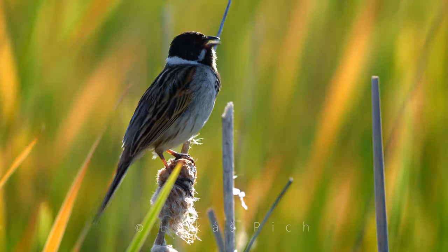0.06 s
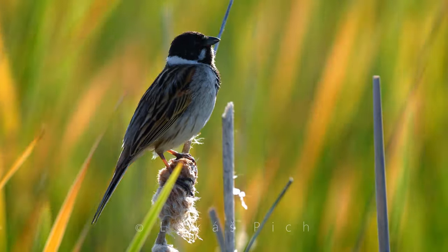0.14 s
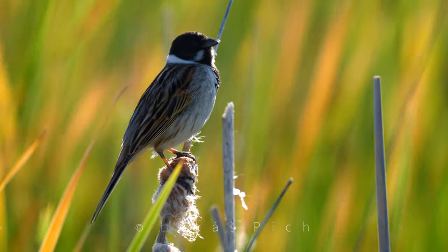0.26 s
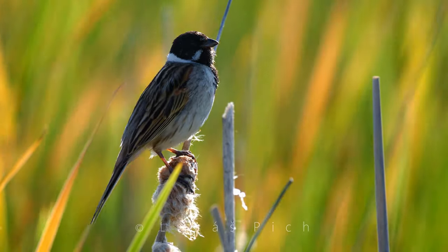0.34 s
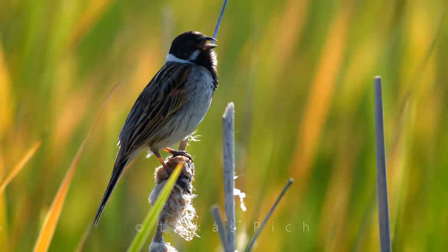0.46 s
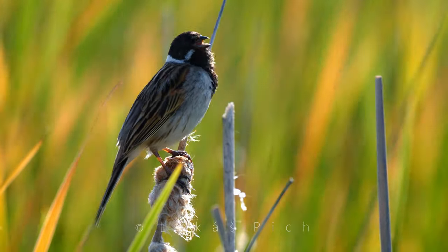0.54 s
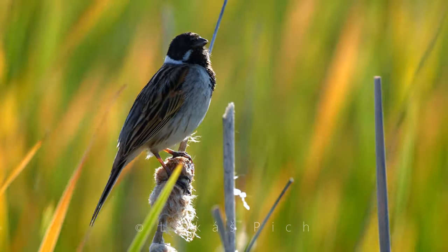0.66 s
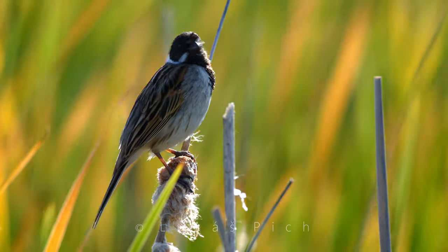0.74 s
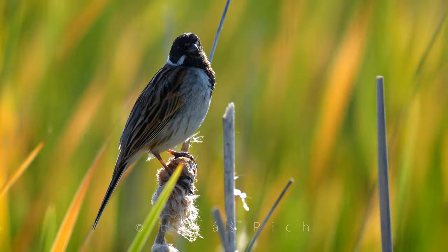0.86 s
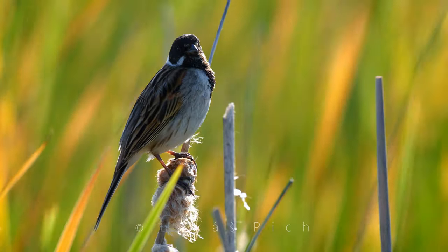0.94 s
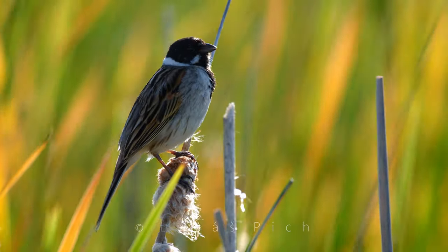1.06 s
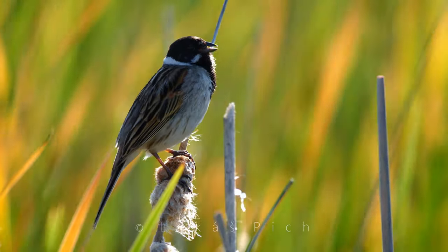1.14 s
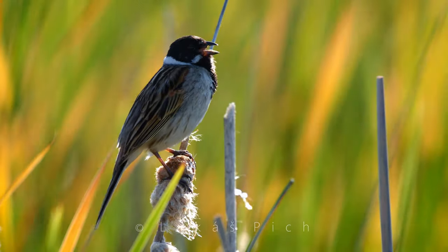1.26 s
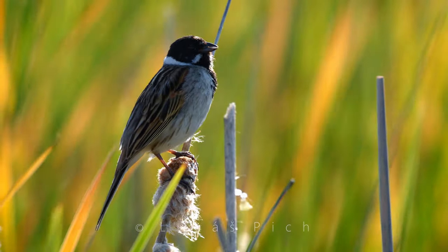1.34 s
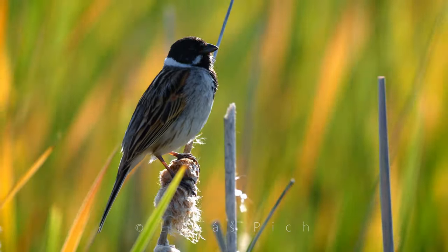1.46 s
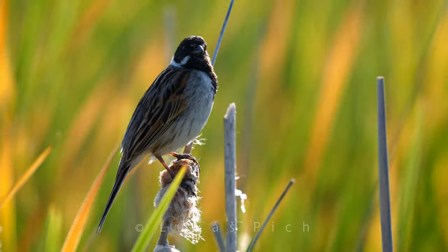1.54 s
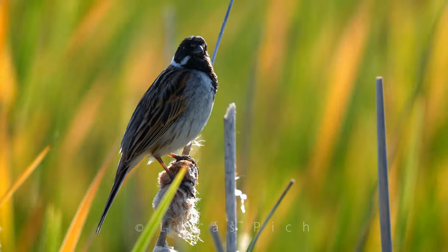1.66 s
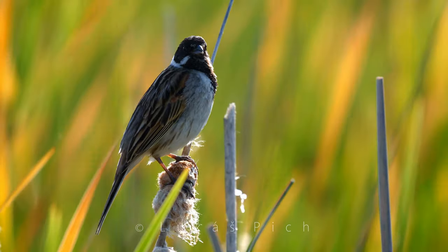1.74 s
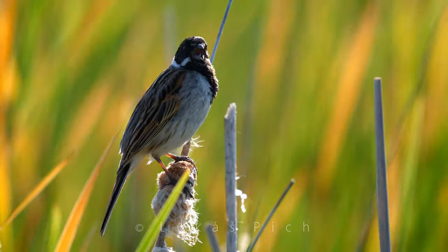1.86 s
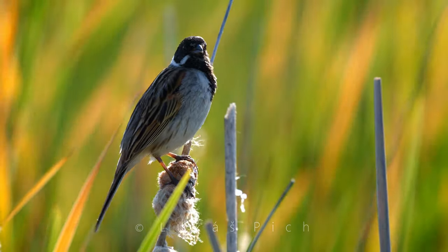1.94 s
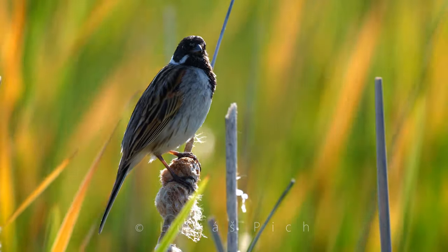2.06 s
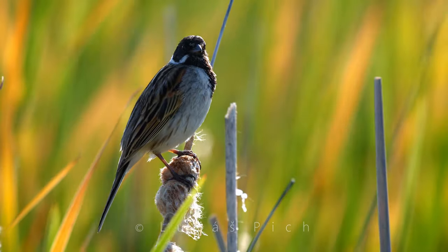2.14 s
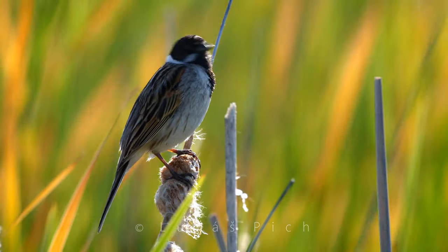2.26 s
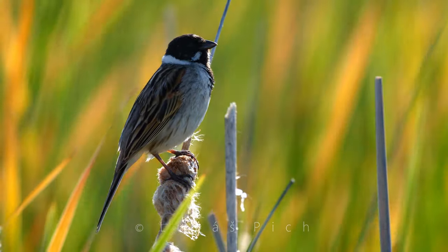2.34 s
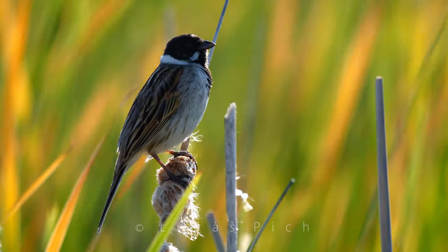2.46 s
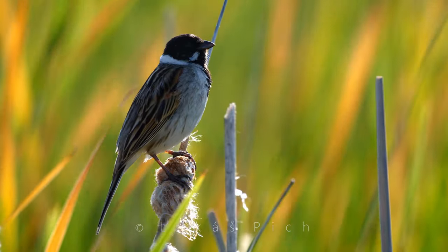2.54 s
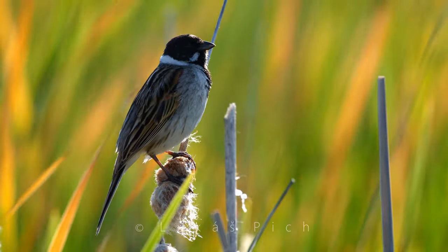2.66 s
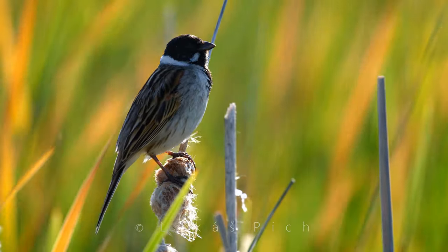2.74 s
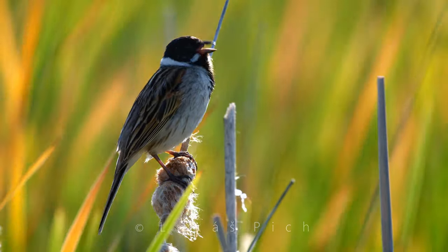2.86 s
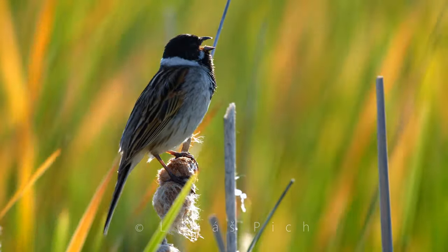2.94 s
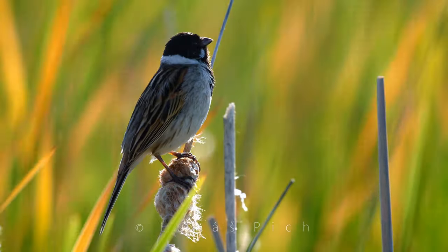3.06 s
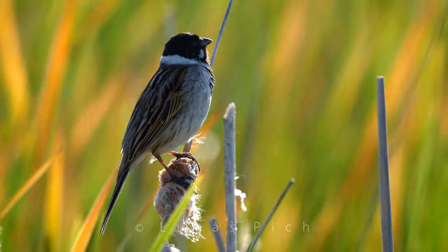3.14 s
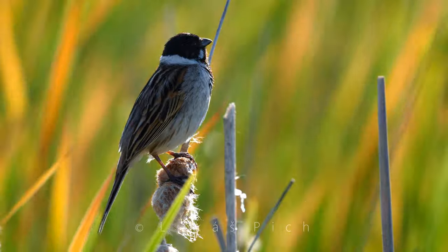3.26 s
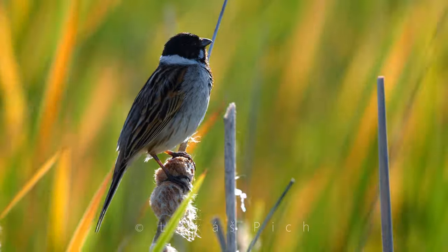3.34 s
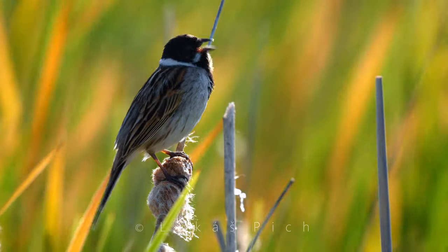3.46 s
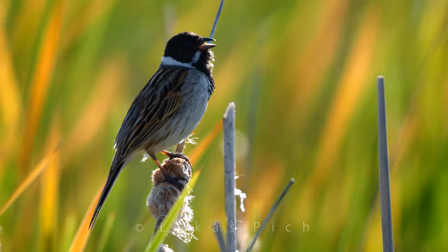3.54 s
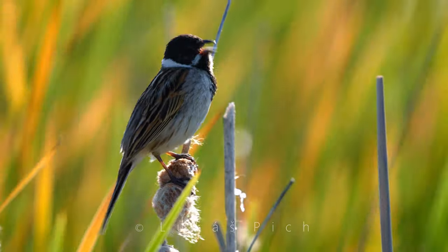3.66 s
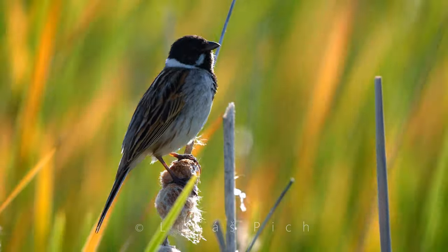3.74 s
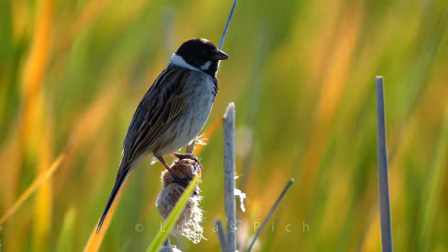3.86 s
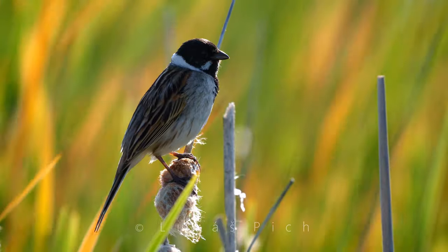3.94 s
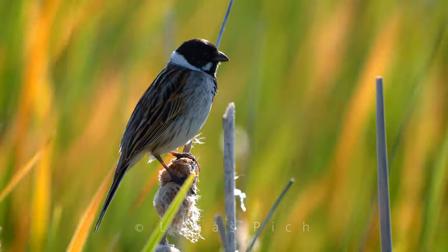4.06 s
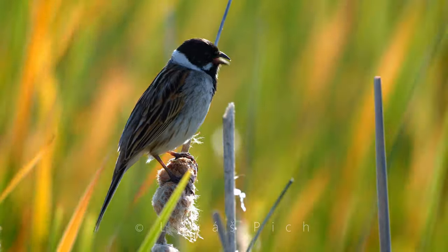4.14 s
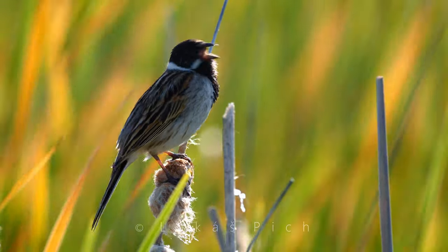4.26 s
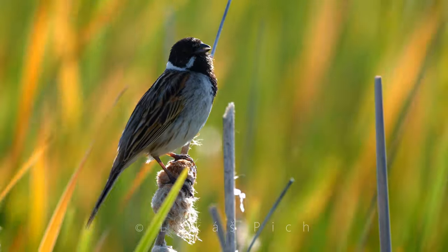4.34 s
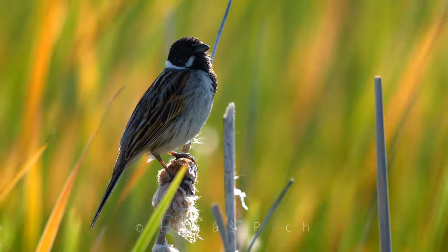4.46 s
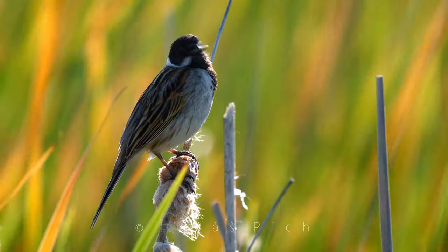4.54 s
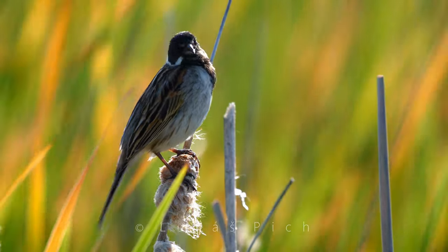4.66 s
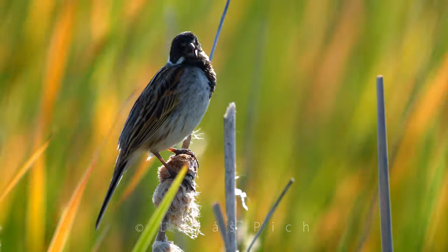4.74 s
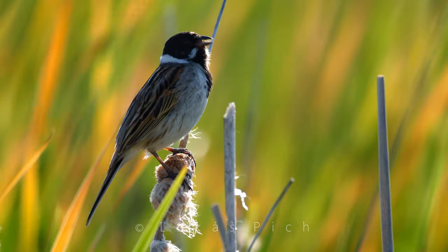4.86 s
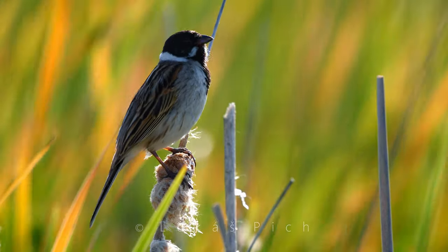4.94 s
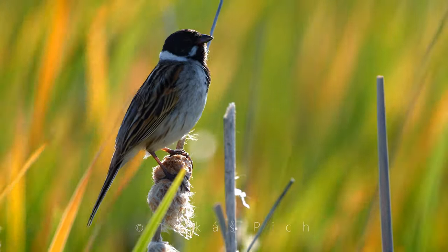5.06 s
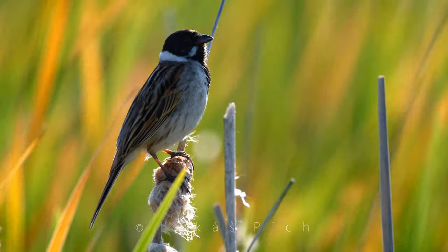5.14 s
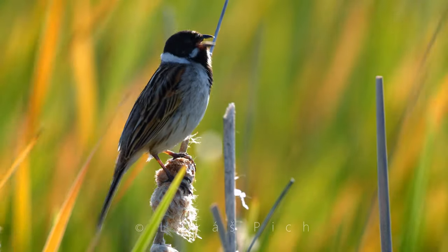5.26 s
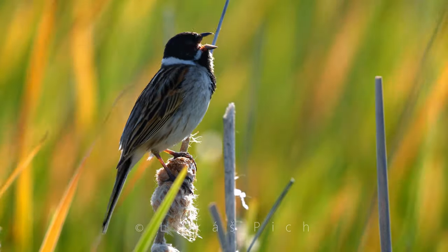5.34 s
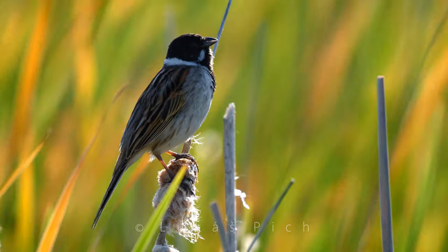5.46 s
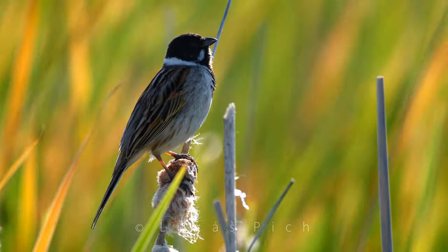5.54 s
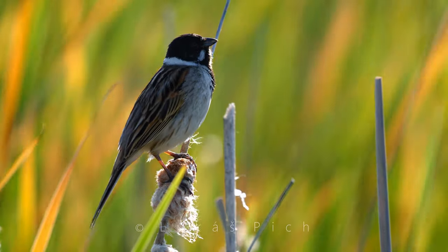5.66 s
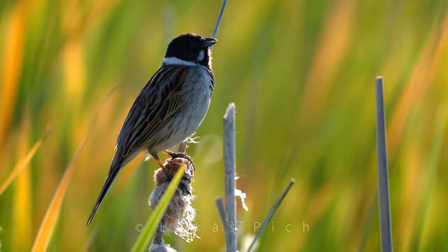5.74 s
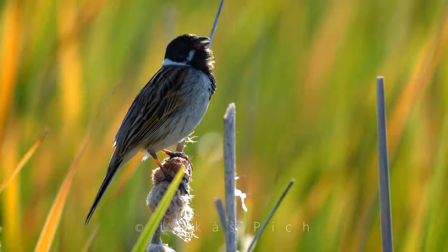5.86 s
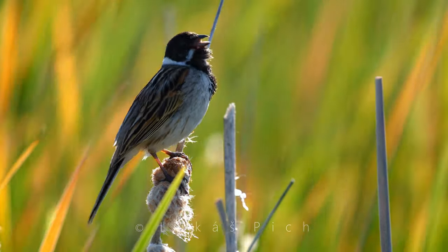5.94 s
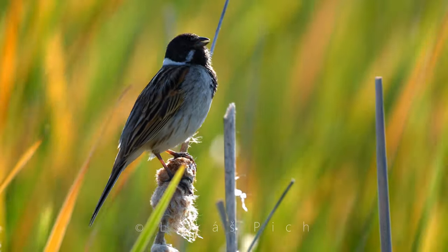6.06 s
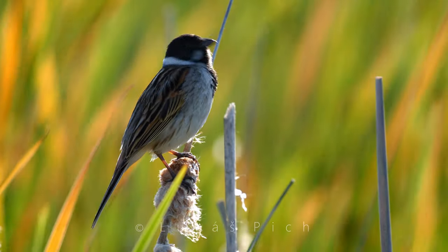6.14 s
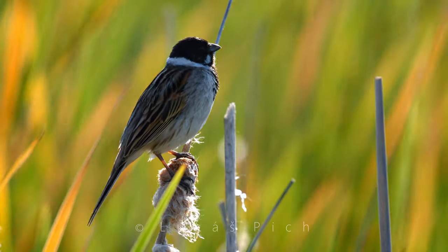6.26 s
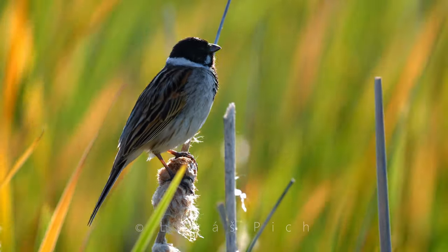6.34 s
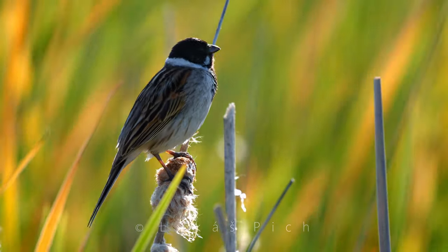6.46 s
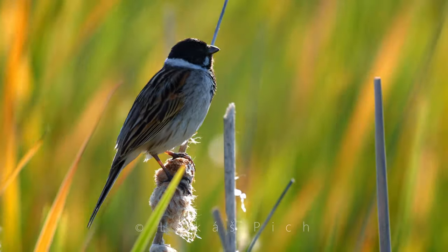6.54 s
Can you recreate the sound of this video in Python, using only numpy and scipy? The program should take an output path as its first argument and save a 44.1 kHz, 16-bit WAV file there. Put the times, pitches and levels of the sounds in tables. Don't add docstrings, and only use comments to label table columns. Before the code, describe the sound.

A small songbird close by sings short whistled and buzzing syllables with pauses between, over faint distant birds, frog ticks and soft marsh hush.

```python
import sys
import numpy as np
from scipy import signal
from scipy.fft import rfft, irfft
from scipy.io import wavfile
from scipy.ndimage import uniform_filter1d

SR = 44100
rng = np.random.default_rng(int(sys.argv[2]) if len(sys.argv) > 2 else 0)


def pcm_store(signal):
    levels = np.round(np.clip(np.atleast_2d(signal), -1, 1) * 32767)
    wavfile.write(sys.argv[1], SR, levels.astype(np.int16).T)


def how_loud(loudness_db):
    steps = np.asarray(loudness_db, float) / 20
    return 10 ** steps


N = 291060
LEAD = SR // 5
M = N + LEAD


def lay(track, start, sound):
    return track + np.pad(sound, (int(start * SR) + LEAD, N))[:M]


def tone(hz, db, second_db, third_db):
    phase = 2 * np.pi * np.cumsum(hz) / SR
    overtones = how_loud(second_db) * np.sin(2 * phase) + how_loud(third_db) * np.sin(3 * phase)
    return np.sqrt(2) * how_loud(db) * (np.sin(phase) + overtones)


def walk(rate):
    hold = int(SR / rate)
    steps = np.repeat(rng.standard_normal(M // hold + 1), hold)
    return 1.3 * uniform_filter1d(uniform_filter1d(steps, hold), hold)[:M]


def band(length, hz, width):
    f = np.fft.rfftfreq(length, 1 / SR)
    bell = np.exp(-2 * ((f - hz) / width) ** 2)
    y = irfft(rfft(rng.standard_normal(length)) * bell, length)
    return y / y.std()


def reeds(x, gap_s, t60, tail_db, far_db=-90):
    t = np.arange(SR // 2) / SR
    tail = rng.standard_normal(len(t)) * np.clip(t / gap_s, 0, 1)
    stems = tail * how_loud(-60 * t / t60)
    bank = tail * how_loud(-60 * t / .55) * np.clip(t / .03, 0, 1)
    stems = how_loud(tail_db) * stems / np.linalg.norm(stems)
    bank = how_loud(far_db) * bank / np.linalg.norm(bank)
    return x + signal.fftconvolve(x, stems + bank)[:M]


def warbled(shape, opening, throb, share, rows):
    out = np.zeros(M)
    s, hz, db = np.transpose(shape)
    open_s, opening_s, depth_hz, slowing, roundness = opening
    dip_db, loudest, sharp, skew, swell_db = throb
    before, after, change_s = share
    t = np.arange(s[0], s[-1], 1 / SR)
    opened = np.clip((t - open_s) / opening_s, 0, 1) * (depth_hz > 0)
    heard = before + (after - before) * np.clip(t / change_s, 0, 1)
    for turn, ratio, effort_db, trough, rate_hz in rows:
        since = t - trough
        cycle = 2 * np.pi * rate_hz * since * (1 - slowing * since) + .16 * walk(70)[:len(t)]
        beat = cycle - 2 * np.pi * loudest
        dip = dip_db * (np.sin(beat / 2) ** 2) ** sharp - swell_db * np.sin(beat) / 2
        swing = np.cos(cycle - skew * (1 - np.cos(cycle))) + roundness * np.cos(2 * cycle)
        pitch = ratio * (np.interp(t, s, hz) - depth_hz * opened * swing)
        loud = np.interp(t, s, db) + effort_db * heard - dip * opened
        sung = signal.windows.tukey(len(t), .05) * tone(pitch, loud, second_db=-59, third_db=-55)
        out = lay(out, turn + s[0], sung)
    return out


def whistles(rows, second_db, edge, waver):
    out = np.zeros(M)
    unsteady = 1 + waver * walk(160)
    for s, length, a_hz, b_hz, c_hz, db in rows:
        u = np.linspace(0, 1, int(length * SR))
        hz = np.polyval(np.polyfit([0, .5, 1], [a_hz, b_hz, c_hz], 2), u)
        hz = hz * unsteady[int(s * SR):][:len(u)]
        envelope = np.clip(np.minimum(u, 1 - u) / edge, 0, 1)
        out = lay(out, s, envelope * tone(hz, db, second_db, third_db=-40.0))
    return out


def glided(rows):
    return [(s, length, a, np.sqrt(a * b), b, db) for s, length, a, b, db in rows]


def arched(rows):
    return [(s, length, end, middle, end, db) for s, length, end, middle, db in rows]


def held(rows):
    return [(s, length, hz, hz, .99 * hz, db) for s, length, hz, db in rows]


def piped(rows, length, ends):
    return arched([(s, length, ends * hz, hz, db) for s, hz, db in rows])


def noise_calls(rows):
    out = np.zeros(M)
    for s, length, hz, width, db in rows:
        n = int(length * SR)
        out = lay(out, s, how_loud(db) * band(n, hz, width) * signal.windows.tukey(n, .3))
    return out * how_loud(2.2 * walk(60))


# (time [s], pitch [Hz], level [dB])
RISES = [
    [(0.0, 3487, -20), (0.018, 3744, -18.5), (0.062, 4235, -15), (0.076, 4630, -19.5), (0.098, 4827, -22.5),
     (0.108, 4650, -30)],
    [(3.522, 2874, -48), (3.534, 2700, -46), (3.548, 2580, -40), (3.562, 2776, -37), (3.664, 3810, -19.5),
     (3.69, 4374, -16.5), (3.706, 4824, -23), (3.716, 4865, -21.5), (3.73, 4610, -45)],
    [(5.897, 2685, -64), (5.907, 2784, -43), (5.923, 2683, -34.5), (6.031, 3766, -20.5),
     (6.067, 4450, -16.5), (6.081, 4793, -23), (6.091, 4730, -24), (6.105, 4820, -52)],
]
# (time [s], pitch [Hz], level [dB])
RISE_OPENING = [(-.1, 2750, -46), (-.084, 2632, -38.5), (-.05, 2950, -31)]
# (opens [s], takes [s], depth [Hz], slowing [1/s], roundness of crests [ratio])
NO_SWING = (0.0017, .01, 0.0039, 0, 0.004)
# (dip [dB], loudest place [cycle], sharpness [1], skew [rad], swell [dB])
FALL_BEAT = (5.7, .01, 1.5, .1, .5)
# (before turn [ratio], after turn [ratio], change [s])
EVEN_SHARE = (1.3, 0.8, .03)


def rising_whistles():
    out = np.zeros(M)
    for shape in [RISE_OPENING + RISES[0]] + RISES[1:]:
        out = out + warbled(shape, NO_SWING, FALL_BEAT, EVEN_SHARE, [(0, 1, 0, 0, 0)])
    return out


# (frequency [Hz], density [dB per Hz])
HUSH = [(12, -40.5), (20, -8.5), (70, -17), (119, -3), (144, -0.5), (232, -2.5), (535, 2), (883, -3.5),
        (1300, -4.5), (1920, -7.5), (4320, -12), (6200, -15.5), (7130, -15), (13100, -24.5), (15500, -22)]
# (time [s], ...)
MOTOR_TIMES = (4.3, 5.1, 6.0, 6.3)


def hush():
    hz, db = np.transpose(HUSH)
    f = np.fft.rfftfreq(N, 1 / SR)
    shape = how_loud(np.interp(np.log(f + 1), np.log(hz), db))
    air = irfft(rfft(rng.standard_normal(N)) * shape, N)
    far_chorus = band(N, 3770, 1200) * how_loud(-69.5 + 1.4 * walk(5.3)[:N])
    gusts_db = 5.5 * np.tanh(walk(26)[:N]) + 3 * walk(8)[:N]
    hiss = band(N, 11500, 8000) * how_loud(-77.5 + gusts_db)
    drone = band(N, 148.0, 40) * how_loud(-69.5)
    running = np.interp(np.arange(N) / SR, MOTOR_TIMES, [0, 1, 1, 0])
    motor = band(N, 310, 16) * how_loud(-68) * running
    return air / air.std() * how_loud(-54.5) + far_chorus + hiss + drone + motor


def chorus(count, db):
    s, length, hz, bend, turn, size = rng.random((count, 6)).T
    hz = 2200 * 2.4 ** hz
    start_hz, end_hz = hz * (0.67 + .2 * bend), hz * (0.89 + .2 * turn)
    return np.transpose([s * (N / SR - .2), 0.026 + 0.071 * length, start_hz, hz, end_hz, db + 6 * size])


# (time [s], length [s], centre [Hz], level [dB])
CHURRS = [(.148, 0.044, 1550, -57), (0.702, 0.11, 1520, -58.5), (0.956, 0.059, 2850, -54.5),
          (1.471, 0.12, 4000, -56), (2.103, 0.059, 3600, -55), (2.2, 0.026, 4200, -52.5),
          (2.736, 0.015, 4140, -56), (5.2, 0.064, 4600, -61), (4.63, 0.2, 2670, -61.5),
          (2.31, 0.12, 3700, -61), (2.52, 0.56, 1030, -66), (.98, .14, 4600, -61), (1.15, .2, 3440, -52.5),
          (0.133, 0.086, 2900, -56.5), (0.78, 0.47, 2760, -62), (1.4, .4, 4200, -65), (2.3, .6, 4200, -66),
          (5.129, 0.13, 2300, -61), (6.422, 0.03, 2200, -58), (0.64, 0.0565, 2500, -57)]


def churrs():
    width = 0.36
    return noise_calls([(s, length, hz, width * hz, db) for s, length, hz, db in CHURRS])


# (time [s], peak level [dB])
SNAPS = [(0.2836, -42), (1.412, -51), (1.619, -44), (2.157, -43.5), (2.8444, -42), (2.876, -39),
         (3.1176, -39.5), (3.143, -34.5), (3.154, -49), (3.37, -46), (3.5047, -38.5), (3.53, -39),
         (3.9794, -51.5), (4.034, -36.5), (4.245, -34.5), (5.0934, -44.5), (6.1268, -36), (6.316, -34)]


def snaps():
    out = np.zeros(M)
    decay = np.exp(-np.arange(200) / 35)
    for s, db in SNAPS:
        out = lay(out, s, how_loud(db - 8.5) * band(200, 8000, 9000) * decay)
    return out


# (time [s], length [s], start [Hz], end [Hz], level [dB])
GLIDES = [(.335, .008, 6400, 5650, -58), (.342, .036, 5550, 4850, -47), (.378, .014, 4700, 3100, -51),
          (.392, .02, 3100, 1800, -59), (.442, .014, 1700, 2450, -56), (1.014, .04, 5000, 4800, -44),
          (1.235, .07, 4450, 4050, -45), (1.5, .088, 1840, 2130, -63), (1.97, .08, 1950, 2130, -59),
          (1.93, .04, 1600, 1950, -62), (1.785, .035, 1800, 2500, -62), (1.85, .07, 1800, 2300, -62),
          (2.015, .03, 3750, 3000, -59), (4.238, .026, 5200, 4100, -52), (4.262, .07, 3700, 1850, -57),
          (6.14, .04, 3750, 3000, -56), (6.185, .025, 3500, 3000, -59), (5.66, .04, 3400, 3100, -61),
          (6.425, .04, 2500, 2300, -59), (6.395, .012, 1650, 1150, -59), (5.515, .04, 3650, 3200, -55),
          (5.555, .05, 3200, 3180, -57), (1.302, .006, 1400, 2100, -48), (2.026, .005, 1100, 2500, -50)]
# (time [s], length [s], end [Hz], middle [Hz], level [dB])
ARCHES = [(.452, .031, 2500, 2750, -44), (.625, .083, 2150, 2620, -54), (.655, .043, 2540, 2620, -51),
          (2.374, .068, 4130, 4030, -50), (6.367, .032, 1550, 1720, -53), (6.369, .03, 1950, 2080, -55),
          (6.368, .026, 5400, 5480, -53), (6.4, .03, 5000, 5020, -57)]
# (time [s], length [s], pitch [Hz], level [dB])
PIPS = [(1.625, .03, 4040, -60), (1.655, .065, 4040, -52), (1.73, .03, 4040, -54), (1.762, .03, 4040, -59),
        (1.848, .02, 2750, -56), (1.89, .025, 2740, -57), (1.308, .022, 1960, -56), (2.13, .025, 1900, -59),
        (5.265, .12, 3240, -58), (1.502, .055, 4050, -53), (1.78, .025, 2800, -55), (2.08, .072, 2780, -59),
        (2.803, .012, 4330, -48), (5.312, .15, 2470, -63), (4.951, .085, 3800, -54),
        (6.55, .029, 2990, -60), (6.588, .048, 3690, -49), (1.398, .07, 1400, -61), (2.07, .09, 1390, -61),
        (1.232, .025, 1420, -59), (1.69, .04, 1350, -61), (5.066, .05, 3780, -57), (4.06, .08, 1500, -64),
        (4.598, .03, 5350, -55), (4.598, .03, 4950, -55), (4.598, .02, 3600, -54)]
# (time [s], pitch [Hz], level [dB])
CROAKS = [(.735, 1480, -53), (.752, 1510, -56), (.785, 1460, -60), (.915, 1510, -58), (0.944, 1460, -50),
          (.963, 1530, -56), (0.999, 1470, -50.5), (1.1, 1420, -60), (1.137, 1445, -56), (1.167, 1440, -57),
          (1.187, 1440, -54), (1.222, 1470, -52), (1.26, 1390, -59)]


def clear_notes():
    croaks = [(s, 0.0092, hz, db) for s, hz, db in CROAKS]
    rows = glided(GLIDES) + arched(ARCHES) + held(PIPS + croaks)
    return whistles(rows, second_db=-34.5, edge=0.084, waver=0.006)


# (time [s], length [s], start [Hz], end [Hz], level [dB])
HOARSE_GLIDES = [(.41, 0.017, 3544, 2834, -44), (.427, 0.0133, 2750, 3250, -50),
                 (0.48, 0.024, 3030, 3394, -46.5), (.71, 0.049, 2525, 2745, -53.5),
                 (.95, 0.023, 2945, 2800, -43.5), (.985, .018, 2700, 2770, -49),
                 (0.79, 0.026, 2880, 2850, -56), (1.002, .012, 3000, 5260, -61),
                 (6.508, 0.019, 6800, 5160, -60.5), (6.512, 0.011, 6460, 6120, -58),
                 (6.54, .05, 6300, 6060, -69), (1.05, 0.08, 4710, 3840, -48),
                 (1.177, 0.012, 6100, 5100, -49), (1.19, 0.02, 4150, 4050, -47),
                 (1.165, 0.061, 2855, 2730, -50), (1.3, 0.043, 4900, 5200, -63),
                 (1.5, 0.19, 2810, 3450, -65), (3.965, 0.065, 4000, 5000, -60.5),
                 (4.63, 0.072, 4500, 4100, -58), (4.66, 0.089, 3700, 3500, -53),
                 (4.64, 0.05, 1500, 1250, -60), (5.08, 0.058, 3750, 3100, -54),
                 (5.12, 0.1, 3650, 3500, -49), (5.1, 0.06, 3100, 3050, -59),
                 (5.2, 0.036, 3200, 3100, -57.5)]
# (time [s], length [s], pitch [Hz], level [dB])
HOARSE_NOTES = [(.78, 0.013, 2700, -46), (1.05, 0.071, 2120, -65), (1.098, .014, 3000, -60),
                (1.128, 0.018, 2940, -53.5), (1.265, .015, 3750, -43), (1.3, 0.05, 3270, -51.5),
                (1.44, 0.031, 4370, -55), (1.48, .059, 3745, -52.5), (1.64, 0.067, 2710, -63),
                (2.74, 0.008, 3690, -54.5), (2.09, 0.077, 4180, -55), (2.33, 0.041, 4120, -55.5),
                (2.355, .015, 4720, -60), (2.77, 0.036, 4330, -67), (2.315, 0.037, 2710, -65),
                (5.1, 0.077, 1247, -66), (5.025, 0.028, 4970, -56), (5.67, 0.13, 3750, -69),
                (2.25, 0.033, 4060, -74), (2.47, 0.029, 4300, -58), (2.83, 0.042, 4300, -63),
                (4.94, 0.1, 4270, -64)]


def hoarse_notes():
    rows = glided(HOARSE_GLIDES) + held(HOARSE_NOTES) + list(chorus(count=60, db=-74))
    return whistles(rows, second_db=-40.5, edge=0.025, waver=.028)


# (turn [s], pitch [ratio], effort [dB], warble trough after turn [s], warble rate [Hz])
TRILLS = [
    (1.876, 1, 0, .0503, 126.3),
    (2.9408, 0.98, -4, 0.052, 124.2),
    (4.259, 0.988, .2, .0617, 116.7),
    (5.369, 0.99, 1.5, .0453, 119.7),
]
FALLS = [
    (3.487, 0.98, -1.5, .0235, 148.3),
    (5.865, 0.98, 2.5, 0.03, 146),
]
ZIGS = [
    (.532, 1.045, -2, .025, 115.4),
    (4.7546, 1.016, 2, .0238, 105.5),
]
ZAGS = [
    (.623, 1.047, -2, .0245, 95.3),
    (4.855, 0.97, 4, .025, 115),
]
# (time from turn [s], pitch [Hz], level [dB])
FALL = [(-.011, 3000, -59), (-.007, 3500, -45.5), (-.003, 5900, -39), (.001, 7400, -47), (.008, 6900, -41),
        (.022, 6300, -31.5), (.036, 5260, -31), (.044, 5000, -30), (.049, 4900, -50)]
PICKUP = [(-.048, 5800, -64), (-.032, 5520, -43.5), (-.008, 5406, -32), (-.004, 5600, -28.5),
          (-.001, 6150, -39.5), (.0005, 5500, -40)]
BUZZ = [(.003, 5096, -24.5), (.015, 4704, -23.5), (0.025, 4404, -16), (0.038, 4261, -15.5),
        (.097, 4190, -22.5), (0.112, 4310, -42.5)]
SHORT_DROP = [(-.027, 4590, -65), (-.018, 4160, -49.5), (-.008, 3570, -23), (-.0005, 2750, -38)]
LONG_DROP = [(-.034, 5300, -52), (-.026, 4450, -36.5), (-.015, 3800, -21.5), (-.009, 3460, -23.5),
             (-.004, 3080, -33.5), (-.0005, 2800, -39.5)]
ZAG = [(.004, 4060, -21.5), (.008, 5250, -29), (.012, 5345, -24), (.029, 5170, -18), (0.052, 5046, -31),
       (.058, 4840, -47)]
# (opens after turn [s], takes [s], depth [Hz], slowing [1/s], roundness of crests [ratio])
BUZZ_SWING = (0.025, .017, 395, .55, .26)
ZAG_SWING = (0.0061, 0.005, 743, .01, .01)
FALL_SWING = (.001, 0.0084, 360, .01, .01)
# (dip [dB], loudest place [cycle], sharpness [1], skew [rad], swell [dB])
BUZZ_THROB = (10.5, 0.46, 5, .1, 4.1)
ZAG_THROB = (16.4, .01, 1.56, .053, .54)
# (before turn [ratio], after turn [ratio], change [s])
BUZZ_SHARE = (1.48, .1, 0.066)
ZAG_SHARE = (.25, 1, 0.0055)
# (time [s], level [dB])
SHADING = [
    [(.495, -13), (.52, 1.5), (.532, -3.5), (.545, 1), (.565, 1), (.572, 5.5), (.585, -11)],
    [(.59, -26), (.6, -7), (.613, 5), (.635, -1), (.65, 3), (.67, 1), (.685, -7)],
    [(1.83, 3), (1.885, 0.5), (1.9, 0.5), (1.92, 0), (1.94, 0.5), (1.966, 2), (1.98, -12)],
    [(2.9, 3.5), (2.93, 0), (2.958, 3), (2.972, -1.5), (3, 0), (3.022, -3), (3.045, 4)],
    [(3.47, 2), (3.49, 0.5), (3.505, -2), (3.52, 2.5), (3.53, -6), (3.54, 6)],
    [(4.22, -0.5), (4.249, 1), (4.277, 2.5), (4.295, -2), (4.32, 2.5), (4.335, -1), (4.352, 4.5),
     (4.362, -1.5), (4.372, 7)],
    [(4.725, 11), (4.737, 9.5), (4.755, -6), (4.77, -0.5), (4.795, 1), (4.805, 4)],
    [(4.82, 0), (4.835, 7), (4.845, -2), (4.857, 0.5), (4.88, 1), (4.905, 1.5), (4.92, -3)],
    [(5.33, -5.5), (5.35, 6), (5.375, 2), (5.39, 0.5), (5.405, 0), (5.42, -1), (5.455, -1.5), (5.48, -0.5)],
    [(5.85, -1.5), (5.87, 1), (5.89, -1.5), (5.902, 1), (5.908, -7), (5.915, -17)],
]


def warbled_syllables():
    out = warbled(PICKUP + BUZZ, BUZZ_SWING, BUZZ_THROB, BUZZ_SHARE, TRILLS)
    out = out + warbled(SHORT_DROP + ZAG, ZAG_SWING, ZAG_THROB, ZAG_SHARE, ZIGS)
    out = out + warbled(LONG_DROP + ZAG, ZAG_SWING, ZAG_THROB, ZAG_SHARE, ZAGS)
    out = out + warbled(FALL, FALL_SWING, FALL_BEAT, EVEN_SHARE, FALLS)
    t = (np.arange(M) - LEAD) / SR
    return out * how_loud(np.interp(t, *np.transpose(sum(SHADING, []))))


def bunting():
    return (rising_whistles() + warbled_syllables()) * how_loud(.7 * walk(150))


# (time [s], pitch [Hz], level [dB])
PHRASES = [
    [(.798, 3250, -66), (.808, 3350, -51), (.834, 2300, -51), (.862, 3100, -41), (.88, 2910, -60),
     (.888, 2966, -40), (.94, 2622, -39), (.95, 2440, -56)],
    [(1.22, 5020, -61), (1.23, 4890, -45), (1.27, 4510, -42), (1.295, 4640, -40), (1.325, 5080, -40),
     (1.36, 5450, -58), (1.37, 5570, -73)],
    [(1.387, 2820, -61), (1.395, 2820, -45), (1.425, 2500, -47), (1.46, 2470, -42.5), (1.492, 2560, -44),
     (1.498, 2540, -67)],
    [(1.212, 4040, -55), (1.225, 3710, -44), (1.235, 3300, -38.5), (1.25, 3250, -42), (1.265, 3420, -48),
     (1.283, 3220, -38), (1.294, 2960, -50)],
]


def phrases():
    out = np.zeros(M)
    for s, hz, db in map(np.transpose, PHRASES):
        t = np.arange(s[0], s[-1], 1 / SR)
        pitch = uniform_filter1d(np.interp(t, s, hz), size=300)
        out = lay(out, s[0], tone(pitch, np.interp(t, s, db), second_db=-38.5, third_db=-42))
    return out


# (time [s], top pitch [Hz], level [dB])
FLICKS = [
    (1.627, 7530, -59.5),
    (1.964, 7430, -57.5),
    (2.317, 7570, -54),
    (2.605, 7440, -49),
    (2.899, 7400, -51),
    (3.189, 7560, -52.5),
    (3.399, 7100, -48.5),
    (3.631, 6970, -50),
    (3.881, 6940, -52.5),
    (4.107, 7000, -54),
]
# (time [s], share of top pitch [ratio], level [dB])
FLICK = [(0, .24, -18), (.005, .45, -13), (.01, .7, -12), (.012, .82, -4), (.02, .9, 0), (.029, .96, 0),
         (.042, 1, -3), (.07, 1, -10), (.1, 1, -26)]


def flicks():
    out = np.zeros(M)
    s, share, db = np.transpose(FLICK)
    t = np.arange(s[0], s[-1], 1 / SR)
    hoarse = 0.023 * walk(700)
    second_db = np.where(t < .008, -4., -60.)
    for start, top_hz, level_db in FLICKS:
        rough = 1 + hoarse[int(start * SR):][:len(t)] * np.exp(-t / 0.066)
        hz = top_hz * np.interp(t, s, share) * rough
        out = lay(out, start, tone(hz, level_db + np.interp(t, s, db), second_db, third_db=-66))
    return out


# (time [s], length [s], level [dB])
RUSTLES = [
    (2.303, .091, -71),
    (3.048, .32, -69.5),
    (3.447, 0.38, -68),
    (5.752, .3, -70),
    (4.018, .1, -73),
    (4.64, .12, -72.5),
    (5.363, 0.11, -70),
    (6.47, .1, -73.5),
]


def rustles():
    return noise_calls([(s, length, 11200, 8000, db) for s, length, db in RUSTLES])


# (time [s], top pitch [Hz], level [dB])
PIPING = [
    (3.312, 1380, -51),
    (3.542, 1414, -51),
    (3.785, 1394, -52.5),
    (4.012, 1494, -51.5),
]
PEEPS = [
    (2.434, 2410, -53.5),
    (2.722, 2384, -50.5),
    (3.02, 2300, -51),
]
# (time [s], length [s], start [Hz], end [Hz], level [dB])
PIPED_FALL = [
    (4.232, .07, 2950, 1103, -54.5),
]


def piping():
    rows = piped(PIPING, length=0.05, ends=.62) + piped(PEEPS, length=0.024, ends=0.5) + glided(PIPED_FALL)
    return whistles(rows, second_db=-8.5, edge=0.21, waver=0.0016)


# (time [s], length [s], centre [Hz], level [dB])
SWELLS = [
    (5.079, .18, 3510, -48.5),
    (5.17, .09, 2980, -52),
    (5.601, .22, 2130, -54),
    (6.15, 0.16, 2100, -54),
]


def swells():
    out = np.zeros(M)
    for s, length, hz, db in SWELLS:
        n = int(length * SR)
        growth = how_loud(db + np.linspace(-5.5, 0, n))
        out = lay(out, s, growth * band(n, hz, 0.19 * hz) * signal.windows.tukey(n, .1))
    return out


# (centre [Hz], length [s], level [dB])
SCOLD = [
    (3250, 0.043, -52.5),
    (4900, 0.03, -48.5),
    (6400, 0.085, -64),
]


def scold():
    return noise_calls([(6.367, length, hz, 460, db) for hz, length, db in SCOLD])


def scene():
    near = reeds(bunting(), gap_s=0.001, t60=0.21, tail_db=-14.0, far_db=-26.5)
    clear = (clear_notes() + phrases()) * how_loud(1.5 * walk(70)) + piping()
    rough = churrs() + snaps() + rustles() + swells() + scold()
    hoarse = (hoarse_notes() + flicks()) * how_loud(4.2 * walk(140))
    far = reeds(clear, gap_s=0.0079, t60=0.22, tail_db=-6.5)
    far = far + reeds(rough, gap_s=0.0018, t60=0.13, tail_db=-4.0)
    farther = reeds(hoarse, gap_s=0.0074, t60=0.31, tail_db=-1.5)
    balance = how_loud(np.array([[-.11], [.11]]))
    return (near * balance + far + farther)[:, LEAD:] + hush()


def band_limit(x):
    return signal.sosfilt(signal.butter(12, 15690, fs=SR, output="sos"), x)


def record(dry):
    opening = np.clip(np.arange(N) / SR / 0.00013, 0, 1)
    return band_limit(dry * opening)


dry = scene()
out = record(dry)
pcm_store(out)
```